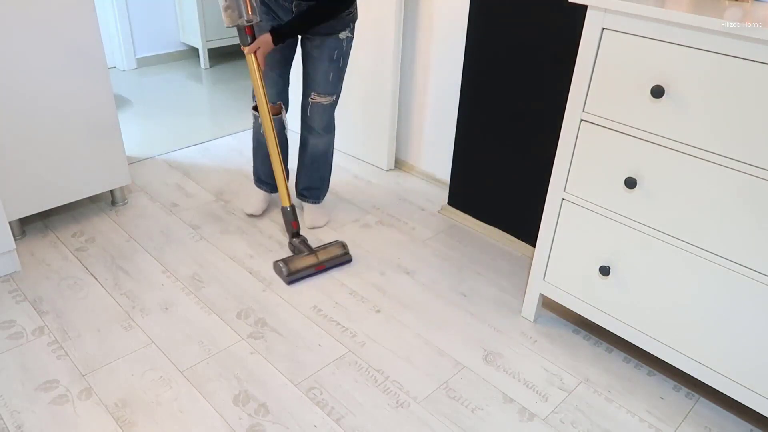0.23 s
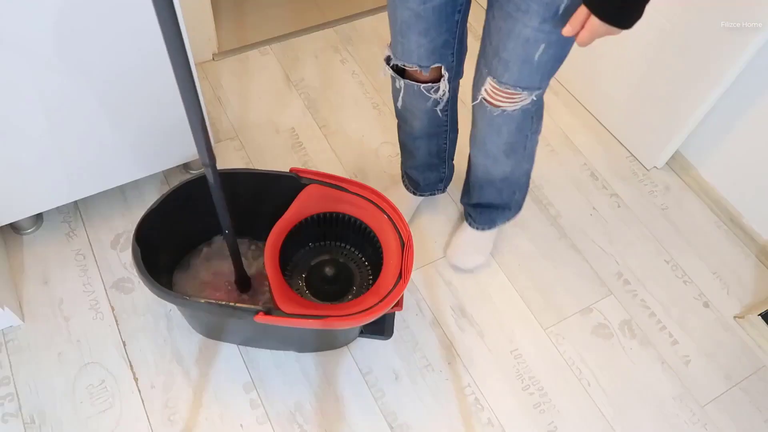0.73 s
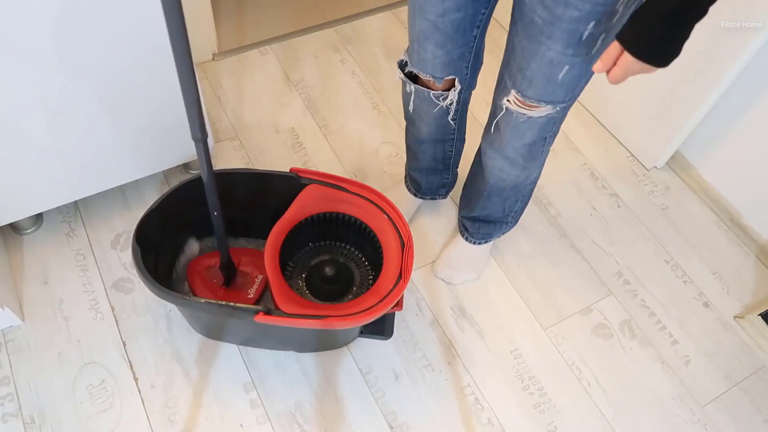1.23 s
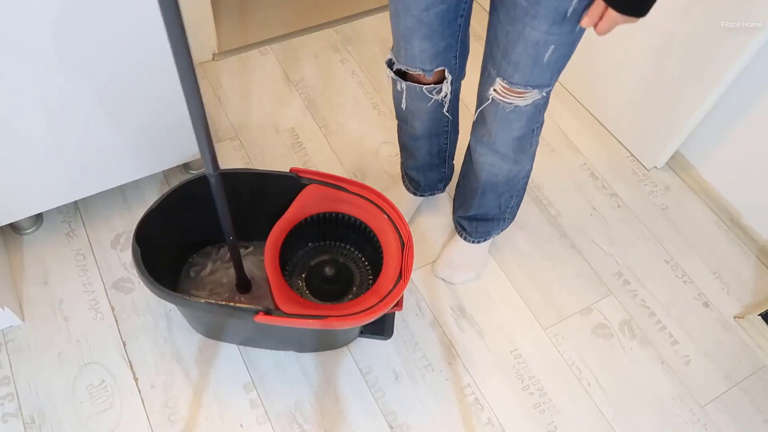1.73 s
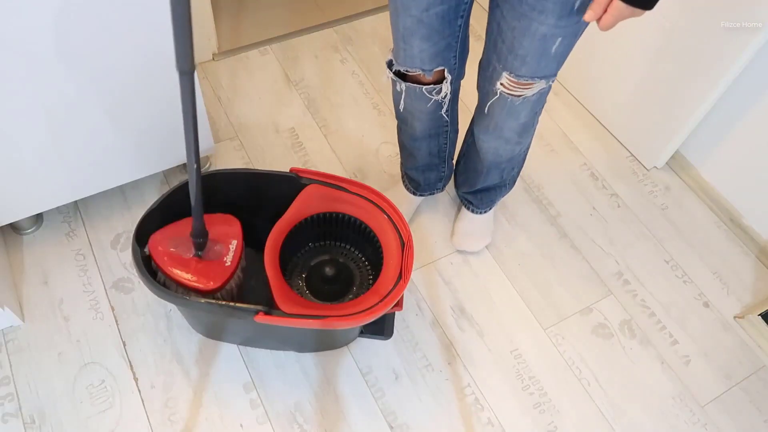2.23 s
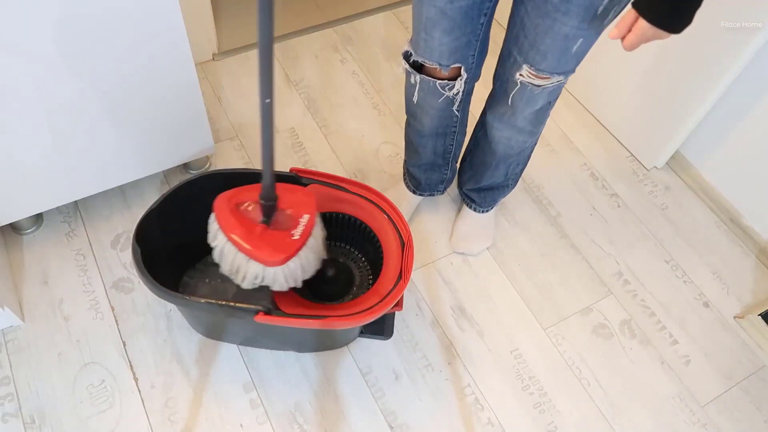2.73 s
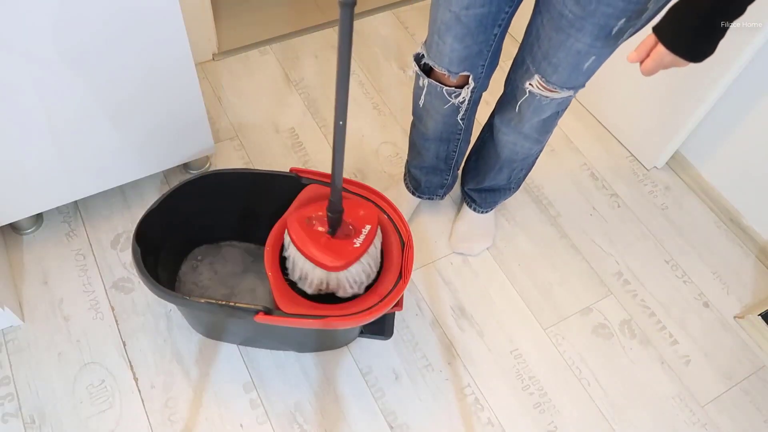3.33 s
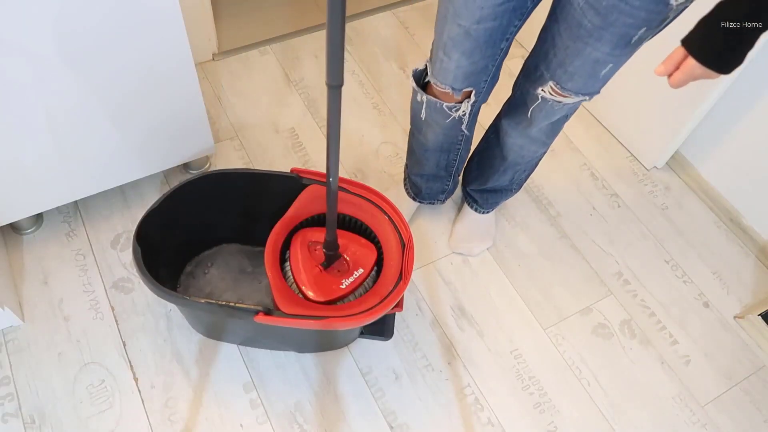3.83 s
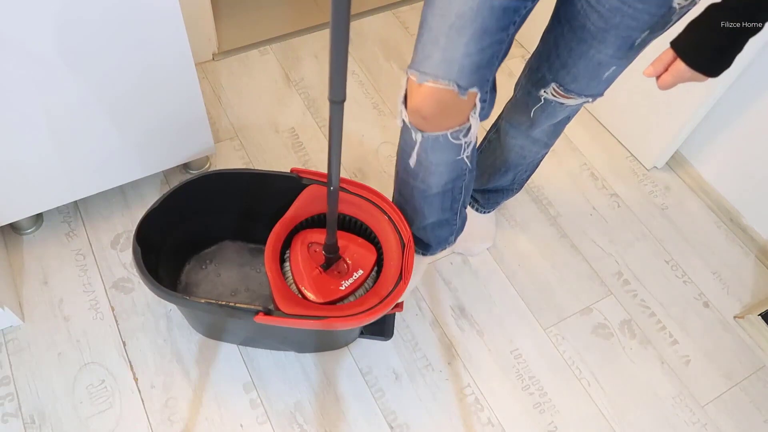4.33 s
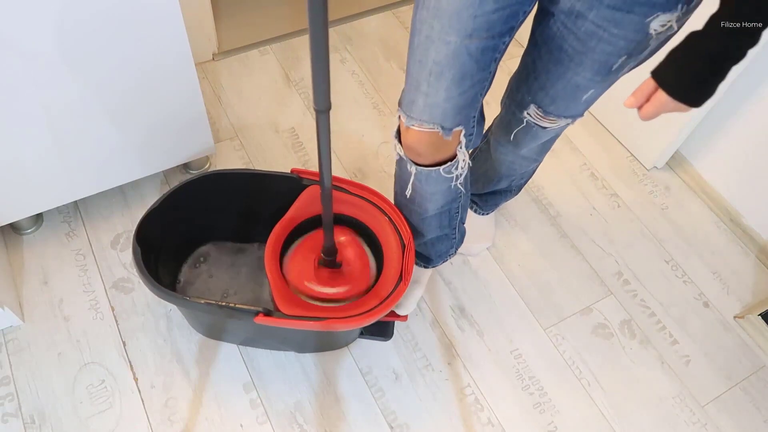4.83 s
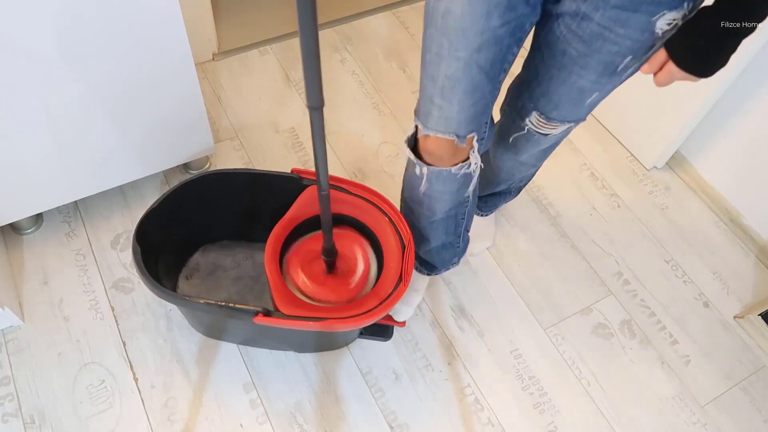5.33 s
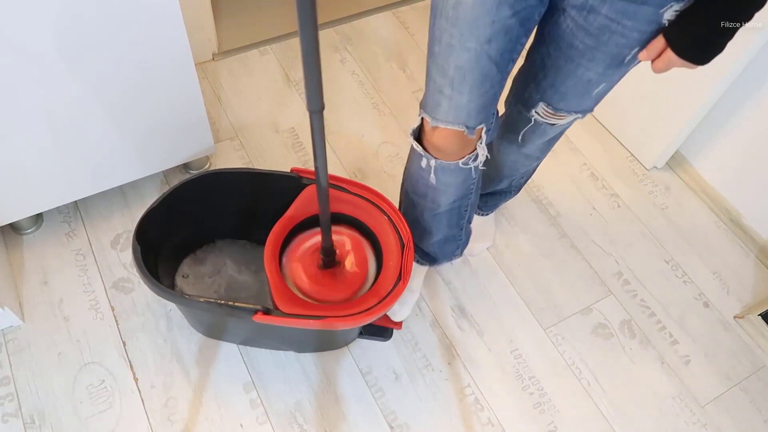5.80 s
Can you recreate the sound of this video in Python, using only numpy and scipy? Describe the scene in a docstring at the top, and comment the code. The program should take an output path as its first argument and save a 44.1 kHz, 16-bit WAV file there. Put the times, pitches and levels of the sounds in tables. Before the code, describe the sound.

A stick vacuum whirs and cuts off, a wet mop sloshes and drips in a bucket, then a pedal wringer rattles and spins.

```python
"""A small room with a laminate floor: a stick vacuum brushes along close by, then breaks off abruptly.
A string mop is dunked in a plastic bucket a little to the left, lifted streaming and dropped in the wringer.
Pushes on the pedal rattle the gears; the basket shakes the tub and flings water against the wall.
Vacuum: roller orders, air noise and whine. Water: ringing bubbles and noise. Plastic and floor: struck
resonances. Squeaks: gliding tones. Quiet room noise lies under everything."""
import sys
import numpy as np
from scipy import signal
from scipy.fft import rfft, irfft, next_fast_len
from scipy.io import wavfile

SR = 44100
rng = np.random.default_rng(int(sys.argv[2]) if len(sys.argv) > 2 else 0)


def store_pcm(level_fs):
    """Save levels as 16-bit WAV."""
    pcm = np.round(np.clip(level_fs, -1, 1) * 32767).astype(np.int16)
    wavfile.write(sys.argv[1], SR, np.atleast_2d(pcm).T)


N = 267466

VACUUM_STOP_S = 0.8194
SPIN_START_S, SPIN_UP_S = 4.809, 0.32
SWELL_RISE_DB = 30  # climb to full strength over a rise time
GRAZE_S = .012  # light contact just before a blow
CONTACT_T60_S, LANDING_T60_S = 0.03, 0.068  # chatter after an ordinary blow and after a heavy landing

# resonances of the tub's walls: (frequency [Hz], width [Hz], relative level [dB])
TUB_MODES = [(129, 9.2, -13), (203, 50, -4.5), (248.7, 41.4, -2), (306.5, 35.6, 0.5), (379, 67, -2.5),
             (538, 43, -0.5), (568, 36.5, 1.5), (680, 144, -6)]
# resonances of the stiff wringer basket: (frequency [Hz], width [Hz], relative level [dB])
BASKET_MODES = [(893, 20, 8.5), (1120, 130, 10.5), (1292, 70, 14), (1416, 42, 18), (1534, 45, 12),
                (1760, 400, 6), (2137, 50, 10), (2223, 45, 10), (2299, 38, 13), (2422, 55, 10.5),
                (2750, 450, 3), (3074, 50, 8), (3550, 500, 1), (4140, 1500, -4)]
# resonance of the floor under load: (frequency [Hz], width [Hz], relative level [dB])
FLOOR_RESONANCE = (123, 24, 0)


def from_db(db):
    """Decibels to amplitude gain."""
    return 10 ** (np.asarray(db) / 20)


def rms_one(x):
    """Scale to unit power."""
    return x / np.sqrt(np.mean(x ** 2) + 1e-20)


def seconds(size=N):
    """Time axis in seconds."""
    return np.arange(size) / SR


def in_time(rows):
    """Each column of a time curve, interpolated at every sample."""
    s, *columns = np.transpose(rows)
    return [np.interp(seconds(), s, column) for column in columns]


def fade_in(at_s, length_s):
    """A ramp from 0 to 1 centred on a moment."""
    return np.clip((seconds() - at_s) / length_s + .5, 0, 1)


def swell(at_s, rise_s, hold_s, fall_db_per_s):
    """Rise, hold and release, in dB relative to full strength."""
    t = seconds() - at_s
    rising_db = SWELL_RISE_DB * np.minimum(t, 0) / rise_s
    return rising_db - fall_db_per_s * np.maximum(t - hold_s, 0)


def colour(x, spectrum):
    """Filter by a (frequency [Hz], gain [dB]) curve, interpolated on a logarithmic frequency axis."""
    hz, db = np.transpose(spectrum)
    size = next_fast_len(len(x))
    bins = np.maximum(np.arange(size // 2 + 1) * SR / size, 1)
    gain = from_db(np.interp(np.log(bins), np.log(hz), db))
    return irfft(rfft(x, size) * gain, size)[:len(x)]


def band(x, spectrum):
    """Colour a sound, with steep slopes beyond the ends of its curve, and scale to rms 1."""
    (low, low_db), (high, high_db) = spectrum[0], spectrum[-1]
    return rms_one(colour(x, [(low / 2, low_db - 40), *spectrum, (high * 2, high_db - 40)]))


def drift(rate):
    """Slow random wander of rms 1, through so many random points a second."""
    knots = rng.standard_normal(4000)
    return rms_one(np.interp(seconds() * rate, np.arange(len(knots)), knots))


def noise(flutter_db=0, rate=60):
    """White noise whose strength flutters."""
    return rng.standard_normal(N) * from_db(flutter_db * drift(rate))


def grains(per_s, spread_db):
    """Random clicks of uneven size and sign."""
    sizes = from_db(spread_db * np.minimum(rng.exponential(1, N), 4))
    return sizes * rng.choice([-1, 1], N) * (rng.random(N) < per_s / SR)


def resonate(x, modes):
    """Parallel two-pole resonances (frequency, width, level) of alternating sign."""
    out = 0
    for k, (hz, width, db) in enumerate(modes):
        r = np.exp(-np.pi * width / SR)
        poles = [1, -2 * r * np.cos(2 * np.pi * hz / SR), r * r]
        ring = signal.lfilter([1, 0, -1], poles, x + 1e-18)
        out = out + (-1) ** k * from_db(db) * (1 - r * r) / 2 * ring
    return out


def low_pass(x, hz):
    """Gentle second-order cut of the treble."""
    return signal.sosfilt(signal.butter(2, hz, fs=SR, output="sos"), x)


def add(track, at_s, sound):
    """Mix a sound into a track at a moment."""
    start = max(round(at_s * SR), 0)
    track[start:start + len(sound)] += sound[:max(N - start, 0)]


def blow(t60, chatter):
    """Force of a blow: a graze, the impact itself, and a dying chatter."""
    graze_db = -14
    lead = round(GRAZE_S * SR)
    t = (np.arange(SR // 5) - lead) / SR
    fade_db = np.where(t < 0, graze_db + SWELL_RISE_DB * t * SR / lead, -60 * t / t60)
    return (t == 0) + chatter * rng.standard_normal(len(t)) * from_db(fade_db)


def struck(force, modes, centre_hz, focus_db=9):
    """A blow favours the modes near a centre, losing focus_db per octave away from it; peak 1."""
    focused = [(hz, width, db - focus_db * abs(np.log2(hz / centre_hz))) for hz, width, db in modes]
    ring = resonate(force, focused)
    return ring / abs(ring).max()


def room(x, width, t60, wet_db):
    """Direct sound and a diffuse tail; separate reflections spread the stereo, mostly in the treble."""
    right_lag_samples = 1  # the bucket stands a little to the left
    t = seconds(size=SR // 2)
    tails = rng.standard_normal((2, len(t))) * from_db(-60 * t / t60) * (t > .003)
    tails /= np.linalg.norm(tails, axis=1, keepdims=True)
    reflected = from_db(wet_db) * signal.fftconvolve(x, tails[0])[:N]
    mid = (x + reflected) / np.hypot(1, from_db(wet_db))
    side = colour(signal.fftconvolve(x, tails[1])[:N], width)
    return np.array([mid + side, np.roll(mid, right_lag_samples) - side])


def ambience():
    """Quiet room: independent coloured noises in the middle and at the sides."""
    # room noise: (frequency [Hz], relative level [dB])
    quiet = [(20, -49), (35, 4), (48, 11.5), (65, -7), (110, -1.5), (300, -4.5), (600, -17), (2000, -41),
             (6000, -28.5), (13000, -35.5)]
    # width of the room noise: (frequency [Hz], side minus mid [dB])
    spread = [(50, -40), (100, -27.5), (1000, 10.5), (4000, 9), (9000, 2)]
    mid, side = (from_db(-44.5) * band(noise(), quiet) for _ in range(2))
    return mid + colour(side, spread) * [[1], [-1]]


def motor_whine():
    """One strong motor tone that bends, and thin ones that waver in pitch and strength."""
    # strongest tone, as the body swings: (time [s], pitch [Hz], level [dB])
    fan_tone = [(0, 3385, -22.5), (.09, 3392, -22), (.13, 3425, -20.5), (.17, 3455, -31),
                (.22, 3375, -20.5), (.3, 3435, -27), (.42, 3410, -36), (.55, 3422, -26.5),
                (.68, 3404, -23.5), (.78, 3410, -36)]
    # thin tones: (mean pitch [Hz], level at the start [dB], change [dB/s])
    thin_tones = [(1136, -44, 14), (1863, -40, 12), (2347, -39, 0), (2595, -37, 7), (3079, -38, 0),
                  (3317, -35, 8), (3553, -37, 0), (3758, -34, 0), (3890, -34, -10), (4301, -41, 0),
                  (11283, -45.5, 0)]
    wander_hz = 4
    age = np.minimum(seconds(), VACUUM_STOP_S)
    fan_hz, fan_db = in_time(fan_tone)
    out = from_db(fan_db) * np.sin(2 * np.pi * np.cumsum(fan_hz) / SR)
    for hz, db, change in thin_tones:
        phase = 2 * np.pi * np.cumsum(hz + wander_hz * drift(30)) / SR
        out = out + from_db(db + change * age + 2 * drift(15)) * np.sin(phase)
    return out


def roller_hum(turn):
    """Overtones of the turning brush roller, strengthening as it bites the floor."""
    # roller: (time [s], hum level [dB], overtone tilt [dB per octave above the second order])
    roller = [(0, -19.5, -9), (.15, -21, -8), (.3, -19.5, -6), (.47, -19.5, -3), (.55, -18.7, .5),
              (.64, -17, 1.5), (.8, -19, .5)]
    # orders: (multiple of the turning rate, relative level [dB])
    orders = [(1, -26), (2, -7), (3, -8), (4, -2.5), (5, 0), (7, -6.5), (10, -18), (11, -17), (12, -17),
              (14, -17)]
    hum_db, bite_db = in_time(roller)
    hum = 0
    for k, db in orders:
        order_db = db + bite_db * np.log2(max(k / 2, 1)) + 2 * drift(19.9)
        hum = hum + from_db(order_db) * np.sin(k * turn + rng.uniform(0, 2 * np.pi))
    return from_db(hum_db) * hum


def wand(x):
    """Close reflections comb the air noise; their paths change as the vacuum swings."""
    # floor and furniture: (delay at the start [s], change of delay [s/s], level [dB])
    reflections = [(.0031, .0004, -10), (.0062, -.0003, -8), (.0083, .0002, -8)]
    t = seconds()
    out = x
    for delay_s, change, db in reflections:
        out = out + from_db(db) * np.interp(t - delay_s - change * t, t, x)
    return out


def floor_head_noise(turn):
    """Bristles and air stream pulse once a turn; air whistles through the gap under the head."""
    # push over the floor: (time [s], bristle level before trim [dB], air level before trim [dB])
    pushing = [(0, -26, -17.5), (.12, -22.5, -20.5), (.23, -15, -17), (.28, -16, -16.5),
               (.35, -11.5, -15.5), (.43, -18.5, -17.5), (.54, -17, -18.5), (.64, -20, -18.5),
               (.8, -13, -17)]
    # floor-head rumble: (frequency [Hz], relative level [dB])
    head = [(30, -34), (70, -16), (120, -23), (160, 0.5), (200, -4), (270, 1), (360, 6), (440, -1),
            (520, -1.5), (620, -5), (720, -11.5), (880, -12), (1100, -8.5), (2000, -23.5)]
    # rushing air: (frequency [Hz], relative level [dB])
    stream = [(500, 10.5), (800, -11), (1100, 2), (1500, 2), (2000, 6.5), (2800, 6), (3400, 7.5),
              (4000, 5.5), (5300, -2.5), (6300, -3.5), (8000, -8.5), (11000, -11.5), (14500, -13),
              (15500, -17)]
    # whistling gap: (frequency [Hz], width [Hz], relative level [dB])
    whistles = [(511, 23, 5.5), (629, 14, 4), (767, 40, -0.5), (905, 16, 4), (1225, 19, -6)]
    head_db, air_db = in_time(pushing)
    # the gap opens, then closes as the roller bites
    gap_db = -17.5 + swell(0.13, rise_s=0.49, hold_s=0.13, fall_db_per_s=44)
    bristles = band(noise(flutter_db=0.5) * (1 + 0.11 * np.cos(turn)), head)
    air = band(wand(noise(flutter_db=0.8) * (1 + 0.034 * np.cos(turn))), stream)
    leak = from_db(gap_db) * rms_one(resonate(noise(), whistles))
    return from_db(head_db - 1.0) * bristles + from_db(air_db - 0.3) * air + leak


def vacuum():
    """The roller beats the floor once a turn, air rushes through the tube, the motor whines."""
    # width of the vacuum's noise: (frequency [Hz], side minus mid [dB])
    spread = [(60, -54), (110, -56), (200, -67), (380, -61), (700, -43), (1290, -86), (2380, -17.5),
              (4390, -5.5), (8110, -1), (15000, 1)]
    turns_per_s = 80.9
    echo_db, echo_fall_db_per_s = -15.5, 351  # what lingers in the room after it stops
    turn = 2 * np.pi * np.cumsum(turns_per_s * (1 + .002 * drift(20))) / SR
    mid = roller_hum(turn) + motor_whine() + floor_head_noise(turn)
    side = colour(floor_head_noise(turn), spread)
    running = 1 - fade_in(VACUUM_STOP_S, 0.021)
    since_stop = np.clip(seconds() - VACUUM_STOP_S, 0, 1)
    echo = from_db(echo_db - echo_fall_db_per_s * since_stop)
    return np.maximum(running, echo) * (mid + side * [[1], [-1]])


def floor_thumps():
    """The landing mop and a hard tread on the pedal thump the floor's low resonance."""
    # the floor takes the weight: (time [s], peak level [dB])
    treads = [(3.8053, -15), (5.5971, -13.5)]
    out = np.zeros(N)
    for s, db in treads:
        force = blow(LANDING_T60_S, chatter=0.025)
        add(out, s - GRAZE_S, from_db(db) * struck(force, [FLOOR_RESONANCE], FLOOR_RESONANCE[0]))
    return out


def squeaks():
    """Plastic slips on plastic: a thin unsteady tone that starts quickly and fades."""
    # pedal and rack: (time [s], length [s], starting pitch [Hz], glide [Hz/s], level before roughness [dB])
    slips = [(4.697, .025, 2500, 0, -38), (4.741, .022, 2080, 4000, -30), (4.757, .016, 3230, 3000, -28),
             (4.758, .03, 2500, 6000, -36), (4.823, .025, 2120, -1500, -30), (4.858, .03, 2180, 2500, -38),
             (4.863, .04, 2720, 4000, -35), (5.295, .045, 2400, -2500, -22), (5.315, .05, 1290, -1500, -19),
             (5.684, .03, 1450, -1000, -11), (5.724, .03, 1300, -1500, -11), (5.752, .025, 1420, 0, -15),
             (5.754, .03, 4080, 0, -24), (5.785, .04, 2320, -3000, -15)]
    attack_s, fade_db = .004, -13  # the fade is reached at the listed length
    unsteady = 1 + .03 * drift(400)
    out, t = np.zeros(N), seconds(size=SR // 5)
    for s, length_s, hz, glide, db in slips:
        pitch = (hz + glide * t) * unsteady[int(s * SR):][:len(t)]
        shape = (1 - np.exp(-t / attack_s)) * from_db(db + fade_db * (t / length_s) ** 2)
        add(out, s, shape * np.sin(2 * np.pi * np.cumsum(pitch) / SR))
    return out * from_db(3 * drift(180))  # the grip catches and lets go


def rustles():
    """Wet strings snag on the basket's ribs: a short swell of dense crackle."""
    # strings dragged over the ribs: (time [s], length [s], centre [Hz], rms before shaping [dB])
    drags = [(3.441, 0.054, 2330, -23.5), (3.718, 0.035, 2600, -27), (4.146, .045, 1620, -27),
             (4.248, 0.027, 2780, -30), (4.468, 0.038, 2820, -30.5)]
    span = 1.15  # the band reaches this factor either side of its centre
    out = np.zeros(N)
    for s, length_s, hz, db in drags:
        size = int(length_s * SR)
        snags = grains(per_s=2500, spread_db=1.5)[:size]
        crackle = band(snags, [(hz / span, 0), (hz * span, 0)])
        add(out, s, from_db(db) * crackle * np.sqrt(np.hanning(size)))
    return out


def spatters():
    """Thrown water smacks the plastic: a very short burst of band-limited noise."""
    # smacks: (time [s], centre [Hz], peak level [dB])
    smacks = [(1.278, 4940, -27), (1.311, 5200, -33), (1.395, 2800, -22), (1.4107, 6740, -25.5),
              (1.581, 3370, -23), (1.631, 4870, -18), (1.661, 5200, -23), (1.697, 3400, -14.5),
              (1.77, 2180, -12.5), (2.924, 2800, -18), (3.579, 3380, -12.5), (3.63, 2270, -19),
              (3.91, 2980, -13), (4.295, 4600, -22), (5.68, 3300, -12)]
    t60_s, span = 0.039, 1.21  # the band reaches this factor either side of its centre
    out, t = np.zeros(N), seconds(size=SR // 20)
    for s, hz, db in smacks:
        burst = rng.standard_normal(len(t)) * from_db(-60 * t / t60_s)
        smack = band(burst, [(hz / span, 0), (hz * span, 0)])
        add(out, s, from_db(db) * smack / abs(smack).max())
    return out


def knocks():
    """Mop and pedal knock on the plastic: a blow and a short chatter ring the basket and the tub."""
    # knocks: (time [s], clack before trim [dB], thud before trim [dB], clack centre [Hz], thud centre [Hz])
    hits = [(1.051, -18, -29, 3180, 360), (1.278, -21, -20, 899, 290), (1.4105, -17, -25.5, 1420, 689),
            (1.565, -21, -22.5, 934, 250), (2.322, -11.5, -23, 870, 323), (3.5565, -13.5, -22.5, 1150, 316),
            (3.628, -11.5, -28, 1540, 406), (3.802, -5, -38, 1270, 300), (3.841, -11, -19, 1250, 310),
            (3.853, -16, -28, 1340, 310), (3.9051, -7, -36, 1730, 333), (4.0844, -19, -53, 2880, 300),
            (4.295, -17, -30, 3000, 520), (4.307, -14.5, -38, 1120, 517), (4.4769, -19.5, -30.5, 3020, 310),
            (4.58, -13, -29.5, 1520, 520), (4.5912, -11, -22, 1220, 333), (5.243, 1, -19, 1380, 570),
            (5.5991, -9, -10, 914, 325), (5.68, 4.5, -37, 1450, 304), (6.0479, -7.5, -11.5, 3030, 610)]
    out = np.zeros(N)
    for s, clack_db, thud_db, clack_hz, thud_hz in hits:
        force = blow(CONTACT_T60_S, chatter=0.27)
        crack = low_pass(force, 4000)
        clack = struck(force, BASKET_MODES, clack_hz) + from_db(-23) * crack / abs(crack).max()
        thud = struck(force, TUB_MODES, thud_hz, focus_db=18.0)
        add(out, s - GRAZE_S, from_db(clack_db - 1.5) * clack + from_db(thud_db + 6.5) * thud)
    return out


def landing():
    """The soaked mop drops into the basket: the whole tub booms and its bottom rings on."""
    landing_s = 3.8045
    bottom_hz, bottom_t60_s, bottom_db = 254.6, 0.2, -21
    out, t = np.zeros(N), seconds(size=SR // 2)
    add(out, landing_s, from_db(bottom_db - 60 * t / bottom_t60_s) * np.sin(2 * np.pi * bottom_hz * t))
    force = blow(LANDING_T60_S, chatter=0.041)
    boom = struck(force, TUB_MODES, 221, focus_db=13.0)
    add(out, landing_s - GRAZE_S, from_db(-2.5) * boom)
    return out


def bumps():
    """Soft blows of the lopsided, whirling basket boom in the tub."""
    # bumps: (time [s], peak level [dB], centre [Hz])
    soft_blows = [(5.053, -12.5, 300), (5.113, -10, 252), (5.16, -14, 238), (5.409, -7.5, 500),
                  (5.543, -8.5, 551.4), (5.622, -9, 280), (5.652, -7, 540), (5.755, -15, 280),
                  (5.819, -12, 560), (5.872, -13, 625), (5.885, -8, 310), (6.0, -8.5, 560)]
    out = np.zeros(N)
    for s, db, hz in soft_blows:
        force = blow(CONTACT_T60_S, chatter=0.096)
        add(out, s - GRAZE_S, from_db(db) * struck(force, TUB_MODES, hz, focus_db=12.5))
    return out


def pedalling():
    """Levels of rumble, gears and flung water in dB: spin-up, a surge per push, and the mop drying."""
    # pushes: (time of full force [s], rise [s], hold [s], gear drive [dB])
    pushes = [(5.14, .08, 0.018, -25.5), (5.31, 0.083, 0.038, -14), (5.743, 0.35, 0.075, -14),
              (6.06, 0.3, .05, -19.5)]
    release_db_per_s = 152
    rumble_db, coasting_db = -19.5, -25.5  # tub and gears after spin-up, between pushes
    rumble_growth = 1.17  # unbalance grows faster than speed
    rumble_follows, flung_follows = 0.27, 0.25  # share of the pedal's surge
    damp_db, soaked_extra_db, drying_s = -40, 15.5, 0.61  # spray of the damp mop; extra while soaked
    age = seconds() - SPIN_START_S
    speed_db = 28.5 * np.clip(age / SPIN_UP_S - 1, -1, 0)
    drive = 0
    for s, rise_s, hold_s, db in pushes:
        drive = drive + from_db(db + swell(s, rise_s, hold_s, release_db_per_s)) ** 2
    surge_db = 10 * np.log10(1 + drive / from_db(coasting_db) ** 2)
    soaked_db = soaked_extra_db * np.exp(-np.maximum(age - SPIN_UP_S, 0) / drying_s)
    # the jolt of a push throws off a burst of water
    squirt_db = -13 + swell(5.685, rise_s=.045, hold_s=0, fall_db_per_s=650)
    flung_db = np.maximum(damp_db + speed_db + soaked_db + flung_follows * surge_db, squirt_db)
    tub_db = rumble_db + rumble_growth * speed_db + rumble_follows * surge_db
    return tub_db, coasting_db + speed_db + surge_db, flung_db


def wringer():
    """The pedal's rack rattles over the gears; the lopsided basket shakes the tub and throws off water."""
    # what the basket feeds into the tub: (frequency [Hz], gain [dB])
    unbalance = [(130, -3), (190, -2), (300, 1), (420, -3.5), (560, -0.5), (800, 1.5)]
    # water flung against the wall: (frequency [Hz], gain [dB])
    flung = [(2000, 1), (3400, 2.5), (4500, -2.5), (6000, -4.5), (8000, -6.5), (10000, -12.5), (13500, -10),
             (15500, -24)]
    teeth_per_s, wobble_per_s = 290, 13.0
    rumble_db, gear_db, spray_db = pedalling()
    sway = np.sin(2 * np.pi * np.cumsum(wobble_per_s * (1 + 0.07 * drift(4.12))) / SR)
    tooth = np.floor(np.cumsum(teeth_per_s * (1 + .15 * drift(30))) / SR)
    teeth = rms_one(np.diff(tooth, prepend=0) * rng.normal(1, 0.31, N))
    # the tub is shaken with every wobble, and unevenly
    shake_db = 1.2 * sway + .8 * drift(32)
    shaking = (teeth * 0.52 + noise(flutter_db=2.5)) * from_db(shake_db)
    tub = rms_one(resonate(colour(shaking, unbalance), TUB_MODES))
    boards = rms_one(resonate(shaking, [FLOOR_RESONANCE]))
    rumble = tub + from_db(-20.5) * boards
    contacts = teeth + rms_one(grains(per_s=180, spread_db=2)) + .4 * noise()
    rattle = rms_one(low_pass(resonate(contacts, BASKET_MODES), 5000))
    spray = band(rms_one(grains(per_s=3600, spread_db=2.0)) + noise(flutter_db=0.5), flung)
    spin = from_db(rumble_db) * rumble + from_db(gear_db + 1.3 * sway) * rattle
    spin = spin + from_db(spray_db - 2.5) * spray
    return spin * fade_in(SPIN_START_S, 0.039)


def stirring():
    """Slosh, splashing and spray in dB: each stroke swells, settles and leaves the water lapping."""
    # mop strokes, from the dunking through the streaming lift to settling in the basket:
    # (time of full strength [s], rise [s], hold [s], slosh [dB], splashing [dB], spray [dB]), before trims
    strokes = [(1.087, 0.026, 0.07, -39.5, -32, -32), (1.26, 0.13, 0.032, -27.5, -35, -39),
               (1.394, 0.016, 0.0034, -46, -25.5, -36), (1.548, 0.2, 0.023, -26.5, -38, -37.5),
               (1.625, 0.055, 0.11, -23, -24.5, -33.5), (1.765, .05, 0.027, -29.5, -27, -52),
               (2.218, 0.09, 0.06, -37, -23.5, -30), (2.317, 0.086, 0.058, -20.5, -23.5, -23.5),
               (2.628, 0.24, 0.038, -29.5, -22.5, -23), (2.788, 0.82, 0.41, -29, -25, -24.5),
               (3.317, 0.14, .07, -46, -43, -38), (3.465, 0.16, 0.26, -33.5, -33.5, -31),
               (3.847, 0.23, 0.06, -24, -25, -29), (3.9, .05, 0.024, -18.5, -29, -37),
               (4.127, 0.21, 0.017, -31.5, -35, -35.5), (4.274, 0.31, 0.085, -31, -34, -40.5),
               (4.57, 0.38, 0.077, -34, -34.5, -55)]
    settle_db_per_s = 132
    lapping_db, lapping_db_per_s = -19, 78  # the water laps on, more quietly
    power = 1e-12
    for s, rise_s, hold_s, *levels_db in strokes:
        surge = from_db(swell(s, rise_s, hold_s, settle_db_per_s))
        lapping = from_db(lapping_db + swell(s, rise_s, hold_s, lapping_db_per_s))
        power = power + np.outer(from_db(levels_db) ** 2, surge ** 2 + lapping ** 2)
    calm = from_db([[-73], [-49.5], [-53]])  # slosh, splashing and spray between strokes
    return 10 * np.log10(power + calm ** 2)


def bubble(hz, db, cycles):
    """A bubble swells and rings briefly, rising in pitch as it nears the surface."""
    attack_s = 0.0018
    t = seconds(size=SR // 14)
    age = t * hz / cycles  # 1 at the end of the ring length
    rise = 0.081 * rng.lognormal(0, .6)  # bubbles differ in how far their pitch climbs
    phase = 2 * np.pi * np.cumsum(hz * (1 + rise * np.minimum(age, 2))) / SR
    return from_db(db + 4.5 - 41.1 * age) * (1 - np.exp(-(t / attack_s) ** 2)) * np.sin(phase)


def plops(splash_db):
    """Single bubbles with smaller fragments, and a scatter of drops until the basket spins."""
    # largest bubbles and lone drops:
    # (time [s], starting pitch [Hz], level before bubble gain [dB], ring length [cycles])
    large_bubbles = [(0.943, 2290, -38.5, 170), (1.049, 3280, -14, 38), (1.138, 2020, -3.5, 13.7),
                     (1.28, 4450, -12.5, 29), (1.282, 277, -20, 3.6), (1.304, 263, -13, 14),
                     (1.4097, 1450, 10.5, 6.1), (1.575, 250, -21, 8.9), (1.695, 3750, -9, 27),
                     (1.701, 1130, 7.5, 7.1), (1.714, 1255, -6.5, 31), (1.769, 1880, -10, 32),
                     (1.845, 1066, -7, 15), (1.863, 3890, -22, 35), (1.905, 2760, -20, 38),
                     (2.61, 1280, -5.5, 13), (2.703, 3510, -12, 36), (2.794, 517, -22.5, 27),
                     (2.844, 4070, -12, 46), (2.865, 4300, -9.5, 45), (2.96, 4030, -13, 37),
                     (3.04, 1295, -5, 13), (3.158, 3980, -5.5, 38), (3.199, 3250, -14, 43),
                     (3.21, 1080, -11, 15), (3.787, 2130, -8, 18), (2.223, 1300, -14.5, 24),
                     (2.337, 299, -15.5, 24), (2.365, 324, -18.5, 20), (2.395, 259, -20.5, 16),
                     (2.412, 1570, -19, 47), (2.528, 1830, -11, 38), (2.573, 1510, -3.5, 20),
                     (2.657, 2520, -11, 33), (2.785, 2400, -15, 36), (2.859, 2570, -0.5, 24),
                     (2.922, 2370, -0.5, 19.6), (3.009, 1175, -6, 15), (3.05, 2190, -6, 32),
                     (3.073, 3710, -6, 32), (3.099, 1190, -5.5, 17.5), (3.104, 1930, 8.5, 11),
                     (3.155, 2510, -0.5, 21), (3.183, 1380, -6.5, 15), (3.276, 4090, -8, 38),
                     (3.313, 760, -21.5, 24), (3.457, 1800, -8.5, 29), (3.49, 1137, -14.5, 27),
                     (3.554, 724, -7.5, 13.5), (3.592, 2115, -6, 27), (3.738, 2330, -5.5, 20),
                     (3.765, 2710, -9, 33), (4.16, 1890, -8.5, 27), (4.315, 1098, -13.5, 37),
                     (4.342, 3060, 4, 13), (4.546, 4460, -20, 47), (4.039, 3050, -21.5, 38),
                     (4.181, 4200, -24, 36), (4.341, 3940, -9, 26), (4.644, 3200, -39, 35),
                     (4.698, 3900, -32, 33), (1.232, 2800, -25, 42), (1.474, 748, -22, 11),
                     (1.579, 3050, -16.5, 32), (1.676, 1280, -8, 17), (1.834, 1170, -21, 11),
                     (2.828, 2680, -19, 30), (2.992, 1330, -15, 16), (3.125, 2680, -16, 20),
                     (3.713, 1180, -21.5, 19), (3.77, 2200, -12, 30), (3.824, 292, -10.5, 16),
                     (4.153, 1131, -20.5, 50), (4.329, 1260, -25, 11), (4.358, 1140, -21, 14)]
    fragments, fragment_s, fragment_db, fragment_octaves = 3, .03, -13, 0.33  # latest delay; spread
    drips_per_s, drip_hz, drip_octaves, drip_cycles = 110, 2422, 0.642, 30
    drip_db, drip_spread_db = 1.5, 1  # offset from the splashing, before bubble gain
    out = np.zeros(N)
    for s, hz, db, cycles in large_bubbles:
        add(out, s, bubble(hz, db, cycles))
        for late, pitch in zip(rng.random(fragments), rng.standard_normal(fragments)):
            fragment = bubble(hz * 2 ** (fragment_octaves * pitch), db + fragment_db, cycles)
            add(out, s + fragment_s * late, fragment)
    times = VACUUM_STOP_S + np.cumsum(rng.exponential(1, size=900)) / drips_per_s
    chance = np.clip(rng.standard_normal(size=(900, 2)), -2, 2)
    for s, (pitch, strength) in zip(times, chance):
        if s < SPIN_START_S:
            db = splash_db[int(s * SR)] + drip_db + drip_spread_db * strength
            add(out, s, bubble(drip_hz * 2 ** (drip_octaves * pitch), db, drip_cycles))
    return out


def bubbling(per_s, low_hz, high_hz, cycles, spread_db, count):
    """A cloud of bubbles in count pitches: each swells for a few cycles and rings at its own pitch."""
    attack_ratio = 2.5  # a small bubble swells this much faster than it dies
    clicks, dealt = grains(per_s, spread_db), rng.integers(0, count, N)
    out = 0
    for k, hz in enumerate(np.geomspace(low_hz, high_hz, count)):
        width = np.log(1000) / np.pi * hz / cycles  # falls 60 dB in the given cycles
        swelling = resonate(clicks * (dealt == k), [(hz, attack_ratio * width, 0)])
        out = out + resonate(swelling, [(hz, width, 0)])
    return rms_one(out)


def water(slosh_db, splash_db, spray_db):
    """The mop heaves the water; what streams off it splashes into bubbles, droplets and spray."""
    # deep slosh: (frequency [Hz], gain [dB])
    slosh_curve = [(80, -2), (130, -8), (170, -9), (250, -2), (315, 3.5), (420, -7.5), (540, -2.5),
                   (700, -14.5), (1000, -4.5)]
    # splashing: (frequency [Hz], gain [dB])
    splash_curve = [(400, -5), (650, -4), (900, -0.5), (1150, 0.5), (1450, -2.5), (2000, 0.5), (2600, -7),
                    (3300, -14.5), (4300, -18), (6000, -23.5), (9000, -56)]
    # fine spray: (frequency [Hz], gain [dB])
    spray_curve = [(1500, 9.5), (3000, 5), (4500, -4.5), (6000, -10), (8000, -14.5), (10000, -17.5),
                   (13000, -12), (15500, -22)]
    lift_s, shallow_hz, shallow_db = 1.9, 147, -3
    gurgles = bubbling(per_s=400, low_hz=136.4, high_hz=814, cycles=9.5, spread_db=-1.0, count=16)
    slosh = band(gurgles, slosh_curve)
    # once the mop is out of the water the deepest gurgles fade
    shallow = colour(slosh, [(shallow_hz, shallow_db), (2 * shallow_hz, 0)])
    slosh = slosh + fade_in(lift_s, .2) * (shallow - slosh)
    cloud = bubbling(per_s=900, low_hz=550, high_hz=6000, cycles=24, spread_db=3.1, count=44)
    splash = band(cloud + from_db(-15) * noise(), splash_curve)
    droplets = bubbling(per_s=1300, low_hz=2400, high_hz=9000, cycles=48, spread_db=3.2, count=32)
    spray = band(droplets + from_db(-5) * noise(flutter_db=2.5), spray_curve)
    wet = from_db(slosh_db - 2.0) * slosh + from_db(splash_db - 0.5) * splash
    wet = wet + from_db(spray_db + 1.0) * spray
    gushes = from_db(1.2 * drift(35))  # water leaves the strings unevenly
    ending = 1 - fade_in(SPIN_START_S + SPIN_UP_S, 0.055)
    return wet * gushes * fade_in(VACUUM_STOP_S, 0.011) * ending


def scene():
    """Vacuum, then mop, bucket and wringer, over the quiet of the room."""
    # width of the mop and water: (frequency [Hz], side minus mid [dB])
    water_spread = [(60, -26), (110, -41), (200, -48), (380, -21), (700, -78), (1290, -22), (2380, -16.5),
                    (4390, -8), (8110, -0.5), (15000, 0)]
    # width of the wringer: (frequency [Hz], side minus mid [dB])
    wringer_spread = [(60, -37), (110, -45), (200, -67), (380, -47), (700, -41), (1290, -42), (2380, -20),
                      (4390, -5), (8110, -5), (15000, -9)]
    room_t60_s = 0.27
    slosh_db, splash_db, spray_db = stirring()
    wet = water(slosh_db, splash_db, spray_db) + plops(splash_db) + spatters() + rustles()
    hard = knocks() + landing() + floor_thumps() + squeaks()
    mopping = room(wet + hard, water_spread, room_t60_s, wet_db=-4.5)
    spinning = room(wringer() + bumps(), wringer_spread, room_t60_s, wet_db=-8.0)
    return ambience() + vacuum() + mopping + spinning


def record(dry):
    """The highest peaks are rounded, and the top above 15.6 kHz is cut steeply."""
    rounded = dry / (1 + (dry / .9) ** 6) ** (1 / 6)
    return signal.sosfilt(signal.ellip(10, .1, 90, 15600, fs=SR, output="sos"), rounded)


dry = scene()
out = record(dry)
store_pcm(out)
```